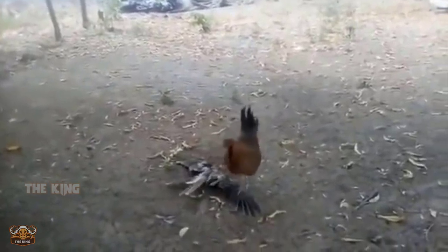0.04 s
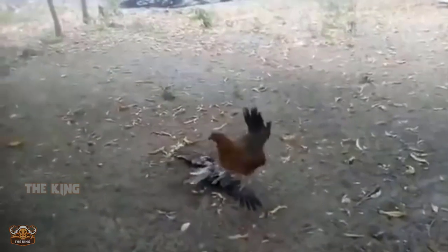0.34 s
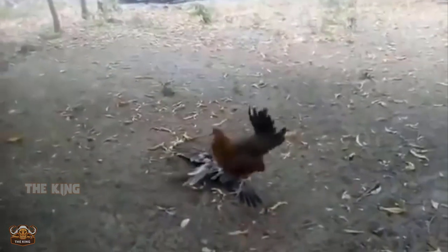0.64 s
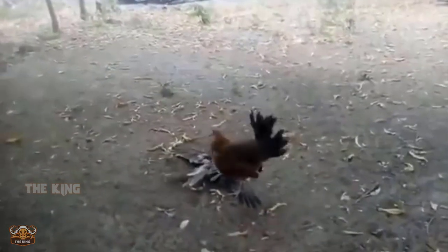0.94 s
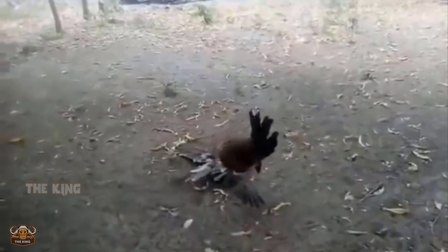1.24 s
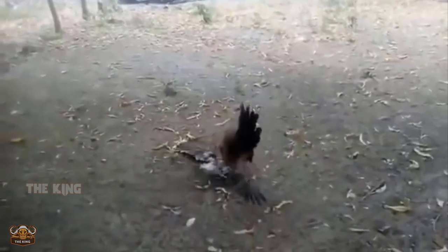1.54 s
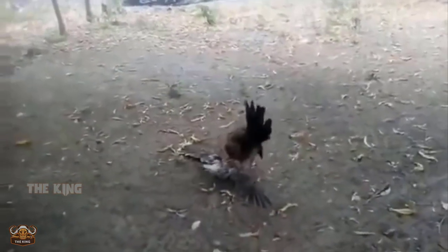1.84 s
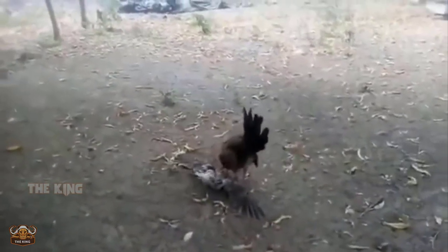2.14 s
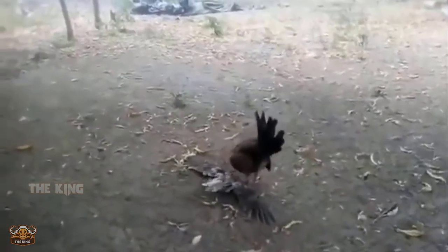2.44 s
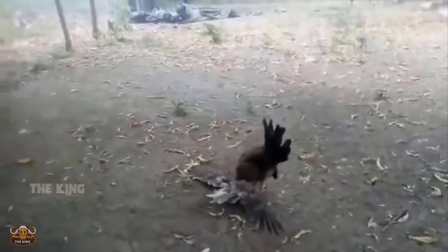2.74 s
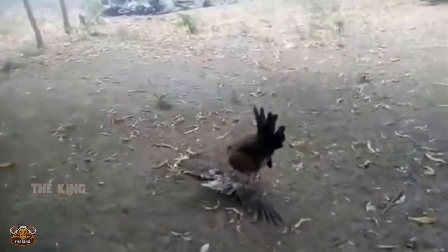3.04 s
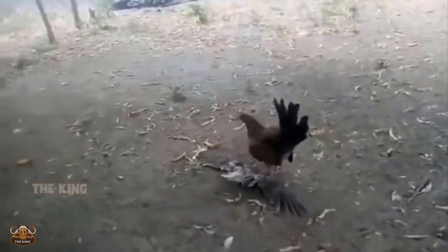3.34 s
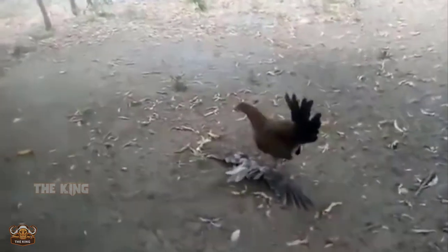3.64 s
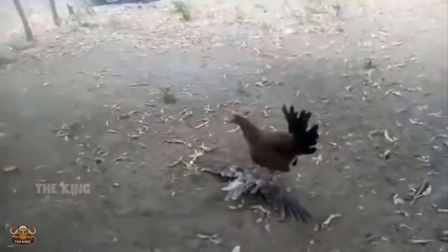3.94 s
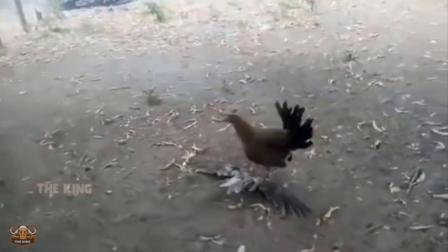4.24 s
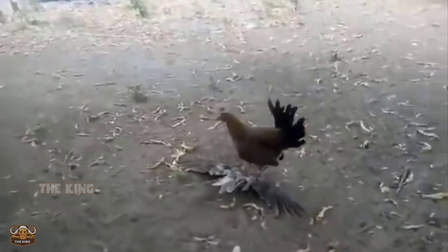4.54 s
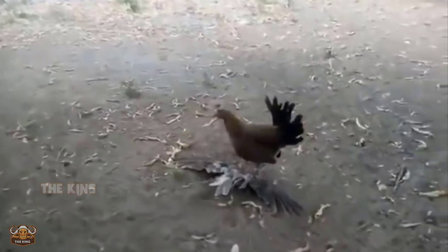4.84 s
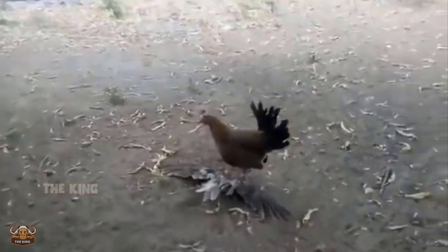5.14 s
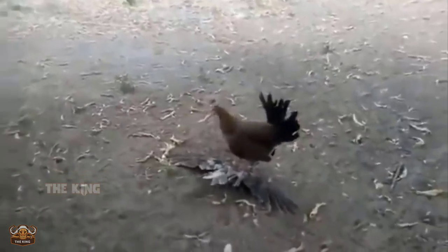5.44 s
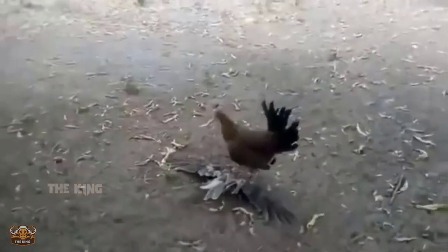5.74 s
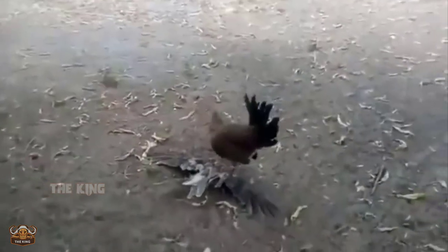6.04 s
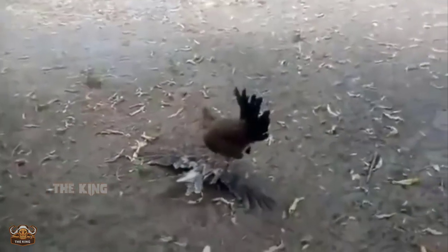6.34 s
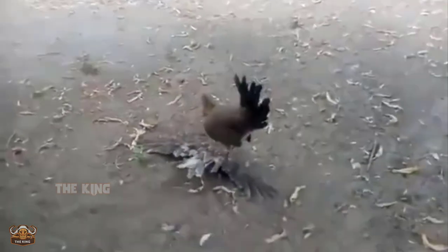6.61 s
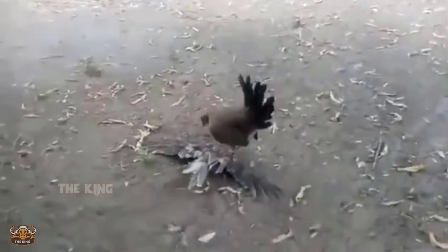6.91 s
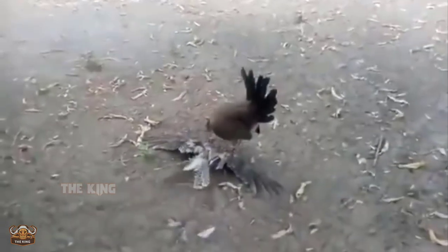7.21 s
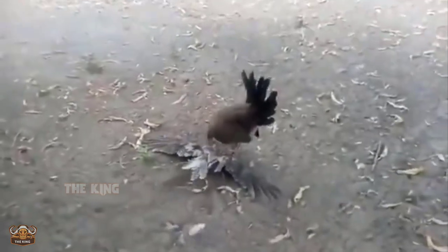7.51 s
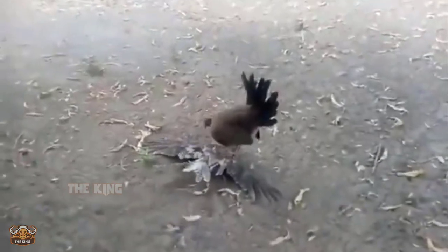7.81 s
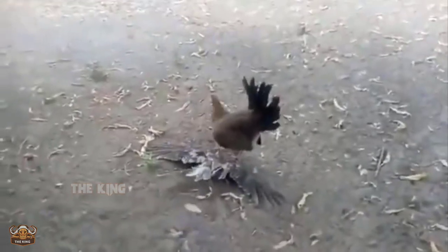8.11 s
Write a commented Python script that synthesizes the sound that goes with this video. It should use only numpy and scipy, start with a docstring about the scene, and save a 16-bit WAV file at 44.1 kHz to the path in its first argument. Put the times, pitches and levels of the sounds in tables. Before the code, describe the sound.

In an open yard, a hen a few steps away squawks loudly several times in a row, her voice wavering between clear tones and a harsh rasp. Runs of quick, croaky clucks follow, broken by more long squawks. Low puffs of wind bump the microphone, mostly in the first half, with a faint leaf rustle and a single small leaf crack. The calls carry a slight outdoor echo.

```python
"""An agitated hen squawks, then clucks, in an open yard a few steps from a hand-held microphone.
Pulses from her syrinx ring through throat and beak. The long calls jump between clean notes and a
rasp; twice a second tone beats against the first. The yard gives a short echo, a dry leaf snaps
underfoot, and a breeze stirs the leaves and thumps the microphone."""
import sys
import numpy as np
from scipy import signal
from scipy.fft import rfft, irfft, next_fast_len
from scipy.io import wavfile
from scipy.ndimage import uniform_filter1d, map_coordinates

SR = 44100
rng = np.random.default_rng(int(sys.argv[2]) if len(sys.argv) > 2 else 0)


def generate_wav(signal):
    """Clip the signal to [-1, 1] and save it as 16-bit WAV at the path in sys.argv[1]."""
    frames = np.transpose(np.atleast_2d(signal))
    scaled = np.clip(frames, -1, 1) * 32767
    pcm = np.round(scaled).astype(np.int16)
    wavfile.write(sys.argv[1], SR, pcm)


N = 369116
TIME_S = np.arange(N) / SR


def amp(db):
    """Decibels to gain."""
    return 10 ** (np.asarray(db) / 20)


def unit(x):
    """Scales to rms 1."""
    return x / np.sqrt(np.mean(x ** 2) + 1e-20)


def steady(x, samples=700):
    """Holds the short-time rms at 1, leaving the fast grain."""
    window = np.hanning(samples)
    power = abs(signal.fftconvolve(x ** 2, window / window.sum(), "same"))
    return x / np.sqrt(power + 1e-12)


def colour(x, spectrum):
    """Filters by (Hz, dB) points joined on a log frequency axis."""
    n = next_fast_len(2 * len(x))
    hz, db = np.transpose(spectrum)
    gain_db = np.interp(np.log(np.fft.rfftfreq(n, 1 / SR) + 1), np.log(hz), db)
    return irfft(rfft(x, n) * amp(gain_db), n)[:len(x)]


def band(x, hz, kind, order=2):
    """Butterworth filter."""
    return signal.sosfilt(signal.butter(order, hz, kind, fs=SR, output="sos"), x)


def wander(n, hz):
    """Random motion of rms about 1, up to about hz."""
    at = np.arange(n) * 2 * hz / SR
    return map_coordinates(rng.standard_normal(int(at[-1]) + 2), [at], order=2, mode="nearest")


def resonate(x, hz, width_hz):
    """Resonance of gain 1 that follows hz."""
    carrier = np.exp(2j * np.pi * np.cumsum(hz * np.ones(len(x))) / SR)
    pole = np.exp(-np.pi * width_hz / SR)
    return 2 * (carrier * signal.lfilter([1 - pole], [1, -pole], x / carrier)).real


def add(mix, start_s, sound):
    """Mixes a sound in at start_s."""
    part = mix[max(0, round(start_s * SR)):][:len(sound)]
    part += sound[:len(part)]


def open_air(level_db=-62):
    """Faint, dull hiss of the outdoors."""
    return amp(level_db) * unit(band(rng.standard_normal(N), 1200, "low"))


# Spectra of wind on the microphone and of leaves. Each row: frequency in Hz, relative gain in dB.
BUFFET_SPECTRUM = [(25, -16.5), (95, 6.5), (170, -4), (330, -17.5), (9000, -105)]
LEAF_SPECTRUM = [(150, -23), (850, -6.5), (6000, -23.5), (11000, -61.5)]
# Puffs on the microphone. Each row: peak time in seconds, level in dB.
WIND_PUFFS = [(.848, -29), (1.175, -37), (1.341, -30.5), (2.359, -39), (2.832, -35), (3.89, -36),
              (4.011, -29.5), (4.377, -32), (4.472, -27.5), (4.559, -26.5), (5.07, -38), (6.914, -48),
              (7.674, -36)]
# Wind between puffs. Each row: time in seconds, level at the top of its lumps in dB.
WIND_LEVELS = [(.5, -44.5), (.95, -39), (4.5, -35), (5.4, -53.5), (7.3, -51.5), (7.8, -42.5)]


def breeze(lumps_db=7, puff_sigma_s=0.013, scuff_db=-8, rustle_db=-12, rustle_lumps_db=4):
    """Low, lumpy turbulence and scuffing puffs at the microphone; the same wind rustles dry leaves."""
    wind_db = np.interp(TIME_S, *np.transpose(WIND_LEVELS))
    lumps = amp(wind_db + lumps_db * (np.minimum(wander(N, 14.9), 1) - 1))
    puffs = sum(amp(db) * np.exp(-.5 * ((TIME_S - s) / puff_sigma_s) ** 2) for s, db in WIND_PUFFS)
    buffet = (lumps + puffs) * steady(colour(rng.standard_normal(N), BUFFET_SPECTRUM), samples=2000)
    scuff = amp(scuff_db) * puffs * unit(band(rng.standard_normal(N), [150, 380], "band"))
    stirs = sum(amp(5 * wander(N, 12)) * resonate(rng.standard_normal(N), hz, hz / 3)
                for hz in np.geomspace(500, 6500, 8))  # large leaves to small
    leaves = unit(colour(stirs, LEAF_SPECTRUM))
    return buffet + scuff + amp(wind_db + rustle_db + rustle_lumps_db * wander(N, 24)) * leaves


def yard_echo(x, echo_db=-12.5, t60_s=0.68, returns=2000):
    """Direct sound plus weak, scattered returns from trunks and ground."""
    taps = np.zeros(SR)
    taps[rng.integers(0, SR, returns)] = rng.choice([-1, 1], returns)
    scatter = unit(taps * amp(-60 * TIME_S[:SR] / t60_s)) / np.sqrt(SR)
    return x + amp(echo_db) * signal.fftconvolve(x, scatter)[:N]


# Each row: start in seconds, level in dB.
LEAF_SNAPS = [(5.367, -44)]


def leaf_snap(level_db, t60_s=0.037):
    """A dry leaf cracks under her foot."""
    t = np.arange(0, t60_s, 1 / SR)
    crack = unit(band(rng.standard_normal(len(t)), [1800, 6500], "band"))
    return amp(level_db - 60 * t / t60_s) * crack


def syrinx(hz, rough, split=0, jitter=0.04, tremor=0.0069, shimmer=0.73, flutter_hz=165.05):
    """Membrane pulses; roughness adds flutter, unsettles their timing and size, and leaks more air."""
    n, rough = len(hz), np.clip(rough, 0, 1)
    cycles = np.cumsum(hz * (1 + tremor * wander(n, 49.54) + jitter * rough * wander(n, 350))) / SR
    flutter_cycles = np.cumsum(flutter_hz * amp(2 * wander(n, 24.98))) / SR
    flutter = rough * np.sin(2 * np.pi * flutter_cycles)
    phase = 2 * np.pi * (cycles + 0.056 * flutter)
    # Each harmonic swells and fades as head and beak move.
    harmonics = (np.cos(k * phase + 2 * np.pi * rng.random()) / np.sqrt(k) for k in range(1, 20))
    pulses = unit(sum(amp(min(1.5 + i, 5) * wander(n, 10)) * tone for i, tone in enumerate(harmonics)))
    swell = 1 + shimmer * rough * wander(n, 250) + 0.18 * flutter
    subharmonic = split * np.cos(phase / rng.integers(2, 4))  # strong and weak pulses take turns
    pulses *= swell + subharmonic
    breath = unit(band((1 + np.cos(phase)) * rng.standard_normal(n), 3500, "low", order=1))
    return (1 - rough ** 2 / 2) * pulses + (.025 + .43 * rough) * breath


# Open beak. Each row: frequency in Hz, relative gain in dB.
BEAK_SPECTRUM = [(550, -11), (1500, -8.5), (2150, 4.5), (2650, -1.5), (2950, -7), (3450, 1), (4600, -11.5),
                 (6400, -10), (8000, -24.5), (13000, -42)]


def throat(drive, hz, bright_db, width_hz, low_hz=460, top_hz=1900, beak=BEAK_SPECTRUM, beak_hz=None):
    """A moving throat resonance gives the body; the beak adds treble, its gape tuning a peak at beak_hz."""
    body = band(resonate(drive, hz, width_hz), low_hz, "high", order=6)
    body = band(body, top_hz, "low", order=5)
    treble = colour(drive, beak)
    if beak_hz:
        treble = treble + amp(-3.5) * resonate(treble, beak_hz, width_hz=300)
    return steady(body) + amp(bright_db) * steady(treble)


def voice(hz, rough, effort_db, throat_hz, bright_db, beak_hz, nasal_hz=1260, nasal_below_db=-24.5):
    """Syrinx through throat. Forced, bright notes roughen; the half-shut beak makes soft ones nasal."""
    strain = np.clip((effort_db + bright_db + 36) / 8, 0, 1)
    drive = syrinx(hz, np.hypot(rough, .2 * strain))
    notch_depth = 0.74 * np.clip((nasal_below_db - effort_db) / 6, 0, 1)
    drive = drive - notch_depth * resonate(drive, nasal_hz, width_hz=790)
    return amp(effort_db) * throat(drive, throat_hz, bright_db, width_hz=550, beak_hz=beak_hz)


# Each row: start and length in seconds, first and last pitch in Hz, level in dB.
SHRILL_EDGES = [(1.226, 0.27, 864, 740, -43)]


def shrill(length_s, hz, end_hz, level_db, peak_hz=5700, width_hz=1500):
    """The top overtones of a falling whine whistle through the nearly shut beak."""
    t = np.arange(0, length_s, 1 / SR)
    drive = syrinx(np.linspace(hz, end_hz, len(t)), rough=0.23)
    whistle = resonate(resonate(drive, peak_hz, width_hz), peak_hz, width_hz)
    gate = np.sqrt(np.sin(np.pi * t / length_s))
    return amp(level_db) * gate * unit(band(whistle, [4000, 7600], "band", order=4))


# One list per tone. Each row: time in seconds, pitch in Hz, level in dB.
SECOND_TONE_CURVES = [
    [(3.625, 632.6, -23.5), (3.765, 629, -28)],
    [(6.24, 616, -23.5), (6.34, 537.6, -25.5), (6.59, 553, -40.5)],
]


def second_tone(rows, attack_s=0.01, release_s=0.042):
    """A second oscillation of the syrinx beats with the call; the throat follows its second harmonic."""
    times_s, pitches_hz, levels_db = np.transpose(rows)
    t = np.arange(times_s[0], times_s[-1] + release_s, 1 / SR)
    gate = np.minimum((t - t[0]) / attack_s, 1) * np.minimum((t[-1] - t) / release_s, 1)
    hz = np.interp(t, times_s, pitches_hz)
    tone = throat(syrinx(hz, rough=0.08), 2 * hz, bright_db=-10.5, width_hz=76, low_hz=500)
    return gate * amp(np.interp(t, times_s, levels_db)) * tone


# Beak during a cluck. Each row: frequency in Hz, relative gain in dB.
CLUCK_SPECTRUM = [(600, -10.5), (1750, -9), (2400, 1.5), (2900, -5), (4300, -14), (6800, -19.5),
                  (11000, -44.5)]
# Clucks are hoarsest mid-run. Each row: time in seconds, roughness 0-1.
HOARSENESS = [(3, .38), (4.7, .58), (6, .52), (7.1, .32)]
# Each row: peak time in seconds, pitch in Hz, relative effort in dB, brightness in dB, throat in Hz.
CLUCK_CALLS = [(1.116, 557.5, -37, -5, 980), (2.438, 494, -38.5, -4, 800), (2.587, 441.3, -35.5, -5.5, 954),
               (2.815, 504, -33, -5.5, 1010), (2.983, 522.5, -32, -11, 1070), (3.043, 493.5, -37.5, 0, 970),
               (3.501, 533.5, -29, -8.5, 1000), (4.025, 496.3, -32.5, -8.5, 960),
               (4.21, 519, -35, -5.5, 1230), (4.351, 460, -41, -13, 815), (4.69, 419, -36, -15, 1090),
               (4.749, 493.7, -35.5, -4.5, 684), (4.871, 526, -34, -6, 1010), (5.053, 434, -40.5, -4, 806),
               (5.17, 500, -35.5, -9, 654), (5.285, 503.5, -38.5, -1.5, 784), (5.414, 437, -33.5, -8, 860),
               (5.548, 415.7, -38.5, 1.5, 690), (5.643, 477, -35, -11, 1020), (5.771, 639, -40, 3, 666),
               (5.802, 505, -31, -6, 740), (6.031, 553.6, -31, -3, 690), (6.965, 502.4, -36.5, -7.5, 625),
               (7.186, 473, -41, -3, 930), (7.374, 486, -39.5, -5, 930), (7.532, 559, -31, -6, 1110),
               (7.728, 510, -35, -8, 940), (7.779, 497, -39, -2, 910), (8.096, 531.6, -32.5, -12.5, 1040),
               (8.317, 554.6, -32.5, -7.5, 910)]


def cluck(peak_s, hz, effort_db, bright_db, throat_hz, note_half_s=0.018, croak_half_s=.032):
    """A brief note inside a slower croak; hoarseness arches and splits it. Returns start, sound."""
    croak_db, croak_rough = -12, .65
    hoarse = np.interp(peak_s, *np.transpose(HOARSENESS))
    t = np.arange(-2 * croak_half_s, 2 * croak_half_s, 1 / SR)
    push = 1 / (1 + (t / note_half_s) ** 4)
    arch = 1 - .5 * hoarse * np.minimum((t / croak_half_s) ** 2, 1)
    arch *= 1 + .05 * hoarse * wander(len(t), 25)
    drive = syrinx(hz * arch, rough=croak_rough + (hoarse - croak_rough) * push, split=.9 * hoarse)
    note = throat(drive, throat_hz * np.sqrt(arch), bright_db,
                  width_hz=740, top_hz=1410, beak=CLUCK_SPECTRUM)
    gate = push + (1 - push) * amp(croak_db) * np.exp(-(t / croak_half_s) ** 4)
    level_db = effort_db + 2.5 + 2.8 * wander(len(t), 70.2)
    return peak_s + t[0], amp(level_db) * gate * note


BREAK_S = .012  # flip into or out of a clean note
# Each row: start and length in seconds, first and last pitch in Hz, effort in dB, throat in Hz,
# brightness in dB.
VOICE_BREAKS = [(0, 0.057, 830, 769, -29, 704, -9), (0.242, 0.039, 904, 864, -19.5, 1740, -6),
                (0.302, 0.08, 633, 662, -25, 835, -6.5), (1.145, 0.12, 517, 510, -40, 776, -5.5),
                (1.3, 0.08, 831, 795, -27.5, 690, -20.5), (1.836, 0.034, 541, 608, -23.5, 1200, -8.5),
                (1.958, .045, 1016, 914, -20, 910, -21.5), (2.085, 0.044, 687, 673, -25, 1450, -14),
                (3.148, 0.0377, 708, 648, -28.5, 1210, 0), (3.794, 0.057, 556, 540, -25.5, 1280, -6),
                (4.47, 0.11, 782, 740, -39.5, 710, -9.5), (4.582, 0.12, 582, 583, -38.5, 654, -25),
                (7.885, 0.055, 691, 665, -32, 1270, 0)]


def clean_note(length_s, hz, end_hz, effort_db, throat_hz, bright_db, rough=0.15, beak_hz=3350):
    """The syrinx locks into one nearly pure glide. Returns lock 0-1, sound."""
    t = np.arange(0, length_s + BREAK_S, 1 / SR)
    lock = np.clip(np.minimum(t, t[-1] - t) / BREAK_S, 0, 1)
    note = voice(np.linspace(hz, end_hz, len(t)), rough, effort_db, throat_hz, bright_db, beak_hz)
    return lock, np.sqrt(lock) * note


def stick_slip(glide_hz, step_hz=41.98, stick=0.771, slip_share=.06):
    """The pitch catches and slips in steps. Returns stepped glide in Hz, slipping 0-1."""
    steps, fraction = np.divmod(glide_hz / step_hz, 1)
    slip = np.tanh((fraction - .5) / slip_share)
    stairs_hz = step_hz * (steps + (1 + slip) / 2)
    return glide_hz + stick * (stairs_hz - glide_hz), 1 - slip ** 2


PUSH_S, FLICK_S = 0.082, 0.058
SAG_S, RISE_S = .07, .04  # pitch time constants
ATTACK_S, RELEASE_S = 0.016, 0.025
# Each row: start and length in seconds; opening, held and closing pitch in Hz; the same three for
# effort in dB; held roughness 0-1; throat and closing throat in Hz; opening and held treble in dB;
# beak resonance in Hz.
SQUAWK_CALLS = [(0.066, 0.16, 752, 766.5, 819, -30, -34, -27, 1, 1150, 890, -37, -37, 3460),
                (0.224, 0.33, 801, 563.5, 746.5, -24.5, -31, -20, 0.32, 1110, 1010, -26, -27, 3200),
                (0.647, 0.42, 693.5, 539.2, 709, -31.5, -35, -26.5, 0.34, 1110, 1460, -39.5, -41.5, 2100),
                (1.25, 0.28, 860, 763.6, 827, -28, -32.5, -26.5, 0.77, 910, 920, -35, -39.5, 2370),
                (1.532, 0.38, 628.4, 530.8, 612, -25, -37, -24, 0, 1250, 1160, -30.5, -35.5, 2060),
                (1.939, 0.3, 901, 675.6, 759.4, -22.5, -24.5, -22, 0.88, 1230, 1150, -35.5, -37.5, 1970),
                (3.13, 0.35, 717, 534.7, 674, -28.5, -33, -26, 0.23, 1330, 1650, -28.5, -45, 1800),
                (3.59, 0.35, 696.3, 563.4, 775, -23.5, -23.5, -26, 0.31, 1130, 890, -28.5, -32.5, 2560),
                (5.84, 0.3, 633, 546.7, 632, -27, -40, -30.5, 0.14, 975, 1460, -29.5, -48.5, 2160),
                (6.104, 0.26, 681.6, 540.6, 607.6, -25, -27, -33, 0.4, 1030, 960, -24, -30, 2820),
                (6.346, 0.28, 801.7, 746, 799, -23.5, -27.5, -31.5, 0.72, 895, 1340, -28, -42.5, 2720),
                (7.866, 0.36, 674, 541.3, 698, -29, -36, -23.5, 0, 1060, 1780, -30.5, -45.5, 1960)]


def squawk(length_s, open_hz, held_hz, close_hz, open_db, held_db, close_db, rough,
           throat_hz, close_throat_hz, open_treble_db, held_treble_db, beak_hz):
    """A long call: a rasping push of air, a wavering held note, a rasping upward flick."""
    t = np.arange(0, length_s, 1 / SR)
    n, left_s = len(t), length_s - t
    push = 1 / (1 + (t / PUSH_S) ** 4)
    flick = 1 / (1 + (left_s / FLICK_S) ** 4)
    sag_hz = (open_hz - held_hz) * np.exp(-t / SAG_S)
    rise_hz = (close_hz - held_hz) * np.exp(-left_s / RISE_S)
    lift_hz, slipping = stick_slip(sag_hz + rise_hz)
    hz = (held_hz + lift_hz) * (1 + 0.00703 * wander(n, 14))
    effort_db = held_db + (open_db - held_db) * push + (close_db - held_db) * flick
    treble_db = held_treble_db + (open_treble_db - held_treble_db) * push
    resonance_hz = throat_hz + (close_throat_hz - throat_hz) * flick
    strain = np.maximum(0.52 * push + 0.73 * flick, .45 * slipping)  # each slip cracks the voice
    rasp = np.hypot(rough * amp(3 * wander(n, 14)), strain)
    gate = np.minimum(t / ATTACK_S, 1) * np.minimum(left_s / RELEASE_S, 1)
    crumble = amp(5 * (1 - gate) * wander(n, 90))
    return gate * crumble * voice(hz, rasp, effort_db, resonance_hz, treble_db - effort_db, beak_hz)


def scene():
    """The hen in the yard, over breeze and open air; mono."""
    squawks, notes, locked = np.zeros((3, N))
    for start_s, *shape in SQUAWK_CALLS:
        add(squawks, start_s, squawk(*shape))
    for start_s, *shape in VOICE_BREAKS:
        lock, note = clean_note(*shape)
        add(locked, start_s - BREAK_S / 2, lock)
        add(notes, start_s - BREAK_S / 2, note)
    hen = squawks * np.sqrt(np.clip(1 - locked, 0, 1)) + notes  # clean notes displace the rasp
    for start_s, *shape in SHRILL_EDGES:
        add(hen, start_s, shrill(*shape))
    for rows in SECOND_TONE_CURVES:
        add(hen, rows[0][0], second_tone(rows))
    for row in CLUCK_CALLS:
        add(hen, *cluck(*row))
    for start_s, level_db in LEAF_SNAPS:
        add(hen, start_s, leaf_snap(level_db))
    return (open_air() + yard_echo(hen) + breeze())[None]


def record(dry, gate_db=-54, cutoff_hz=14000):
    """Soft noise gate, then a low-pass."""
    power = abs(uniform_filter1d(dry ** 2, size=1000))
    gated = dry * np.sqrt(power / (power + amp(gate_db) ** 2))
    lowpass = signal.firwin(511, cutoff_hz, window=("kaiser", 9), fs=SR)
    return signal.oaconvolve(gated, lowpass[None], "same")


dry = scene()
out = record(dry)
generate_wav(out)
```